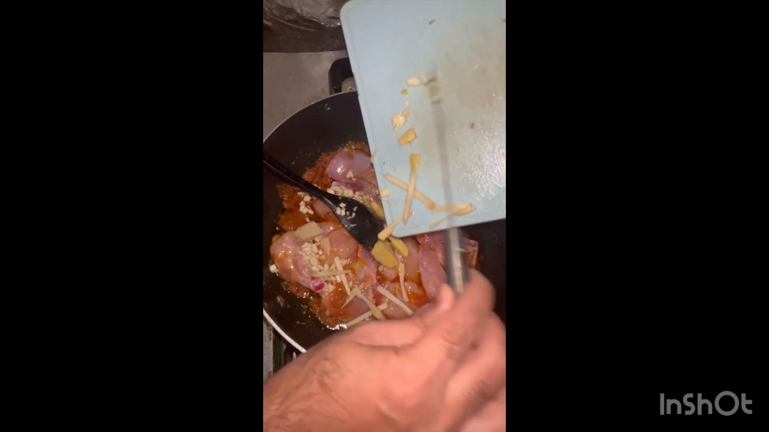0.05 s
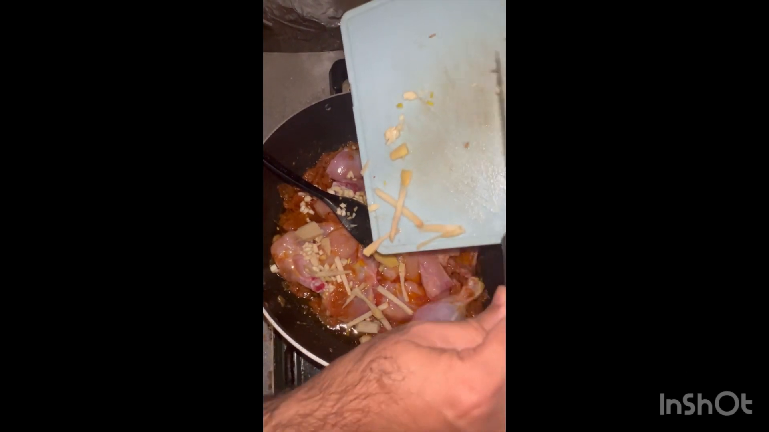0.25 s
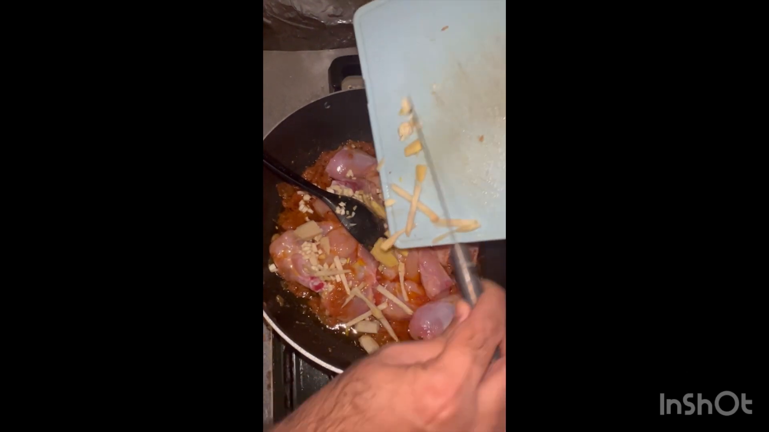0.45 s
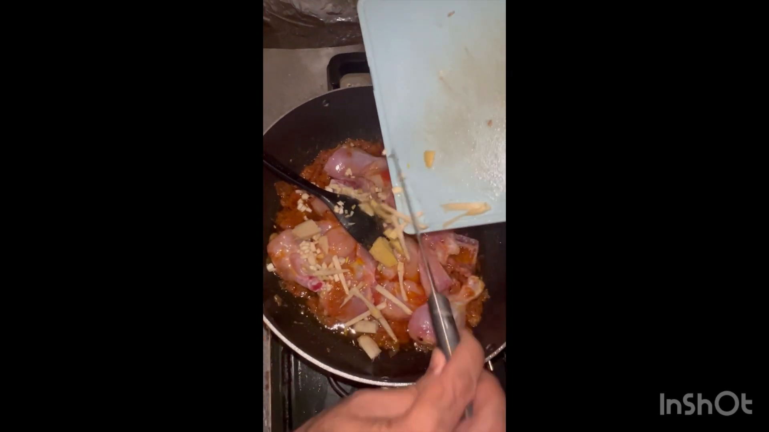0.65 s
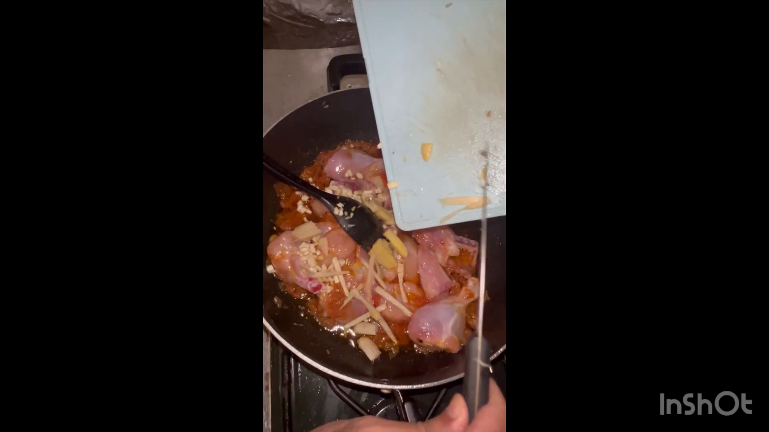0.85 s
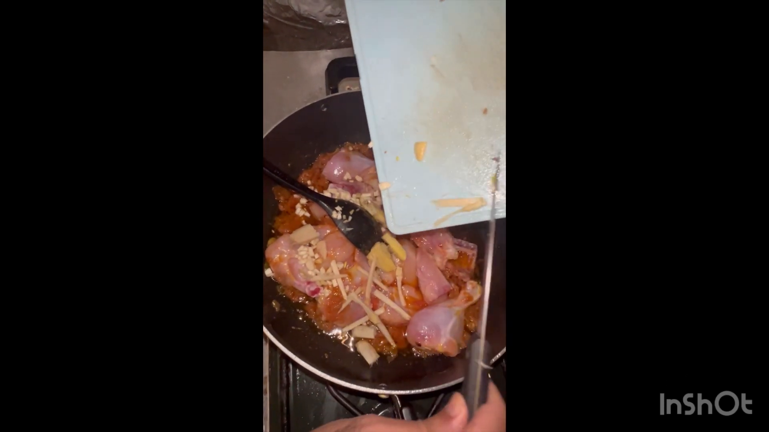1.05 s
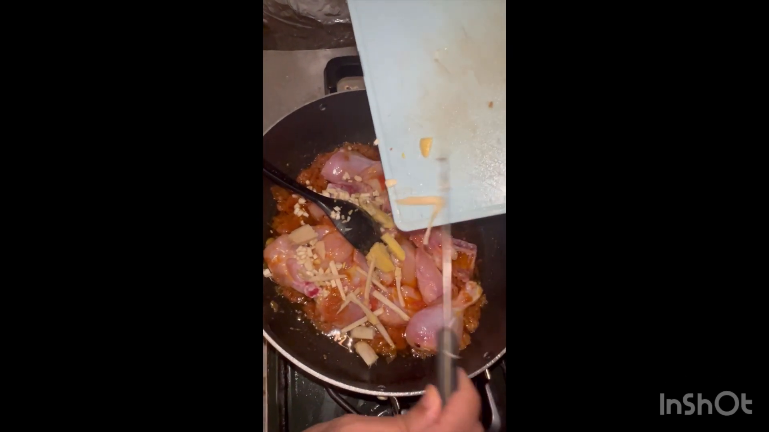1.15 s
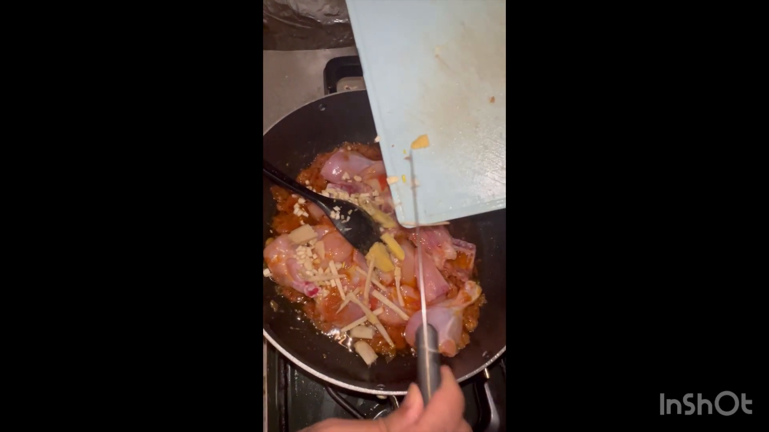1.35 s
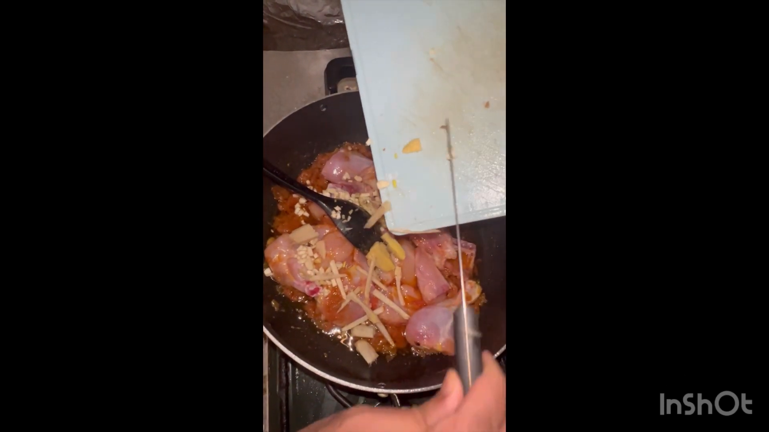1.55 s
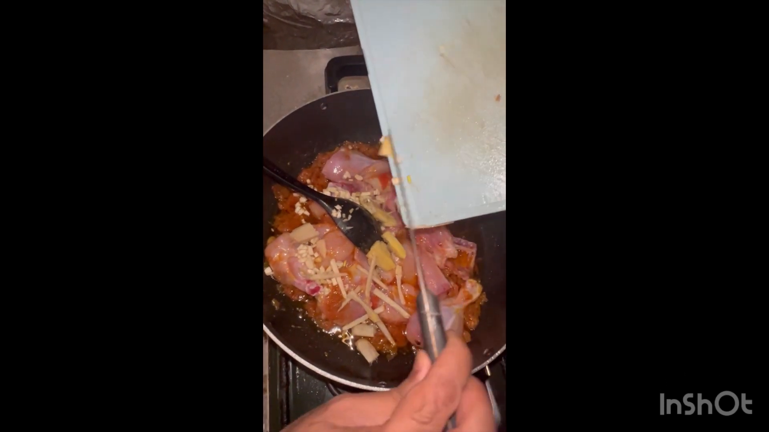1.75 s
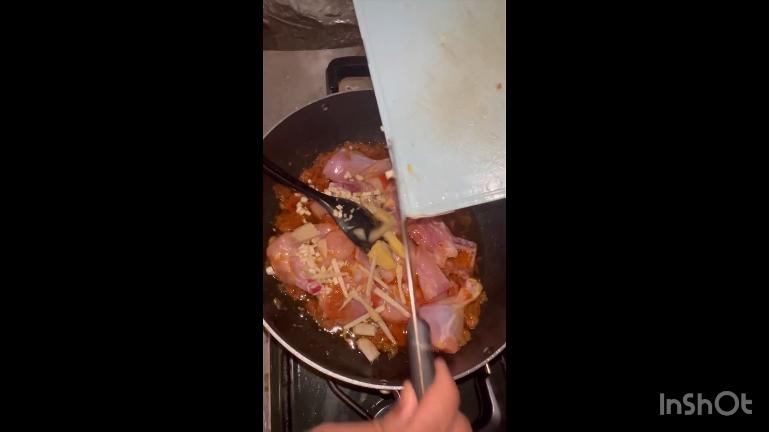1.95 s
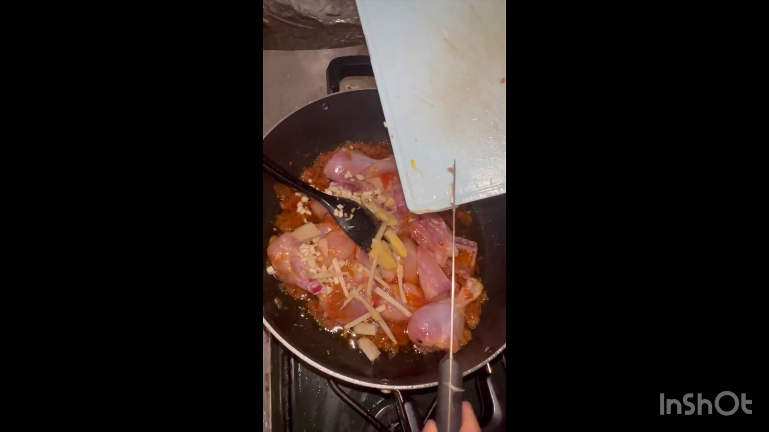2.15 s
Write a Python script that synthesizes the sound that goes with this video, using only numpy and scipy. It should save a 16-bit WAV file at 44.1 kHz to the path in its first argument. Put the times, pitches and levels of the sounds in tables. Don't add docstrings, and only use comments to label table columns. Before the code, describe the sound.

A knife scrapes a plastic cutting board close up: three hard knocks, each followed by a short gritty rasp, the first loudest. Scraps patter lightly into a pan. Small kitchen, low electrical hum, close stereo microphone.

```python
import sys
import numpy as np
from scipy import signal
from scipy.io import wavfile
from scipy.ndimage import uniform_filter1d

SR = 44100
rng = np.random.default_rng(int(sys.argv[2]) if len(sys.argv) > 2 else 0)


def wav_out(sig):
    wavfile.write(sys.argv[1], SR, np.round(np.clip(np.atleast_2d(sig).T, -1, 1) * 32767).astype(np.int16))


def invert_db(level):
    return 10 ** (np.asarray(level, dtype=float) / 20)


N = 97020

MEAN_BRIGHT_DB, DULL_HZ, BRIGHT_HZ = -10, 818, 6300
TILT_CURVE = 0.76
RASP_DB = 0.94

# frequency in Hz, level in dB per Hz.
RASP_SPECTRUM = [(1000, -20), (2300, -26.5), (3000, -18), (6000, -17), (11500, -24), (13000, -40),
                 (15000, -28), (17000, -40)]
# frequency in Hz, left-right likeness (1 = identical).
CONTACT_LIKENESS = [(900, 0.66), (2500, 0.32), (5000, 0.73), (12000, 0.63)]
# start in seconds, peak in dB, sharpness in dB per octave,
# crack level in dB, crack tilt in dB per octave.
BLOWS_1 = [
    (0.2155, -12, 2.5, -2.5, -9),
    (0.2309, -19.5, 2, -25, -11.5),
    (0.239, -19.5, -13, -4.5, -8.5),
    (0.551, -25, -27, -14.5, -0.5),
]
BLOWS_2 = [
    (0.995, -18, 0.5, -4.5, -6.5),
    (1.003, -29.5, 1, -10, -15),
    (1.297, -44, 0, -3.5, -10),
    (1.308, -51.5, 2.5, 8, -9),
]
BLOWS_3 = [
    (1.5494, -12.5, -0.5, -4.5, -10),
    (1.5649, -19, -10, -14, -8.5),
    (1.5728, -26, -4.5, 0, -13.5),
    (1.7497, -27.5, 2, -5, 2),
    (1.82, -44.5, 0.5, 1.8, -1),
    (1.931, -67.5, 6, 8.5, 0.5),
]


def rms_one(x):
    return x / np.sqrt(np.mean(x ** 2) + 1e-20)


def at_hz(points, hz):
    points = np.array(points)
    return np.interp(np.log(hz), np.log(points[:, 0]), points[:, 1])


def high_pass(x, hz, order):
    return signal.sosfilt(signal.butter(order, hz, "high", fs=SR, output="sos"), x)


def band_pass(x, low_hz, high_hz, order):
    return signal.sosfilt(signal.butter(order, [low_hz, high_hz], "band", fs=SR, output="sos"), x)


def drift(rate_hz):
    r = np.exp(-2 * np.pi * rate_hz * 8 / SR)
    slow = signal.lfilter([1], [1, -2 * r, r * r], rng.standard_normal(N // 8 + 4002))
    slow = slow[4000:]
    return np.interp(np.arange(N) / 8, np.arange(len(slow)), rms_one(slow - slow.mean()))


def fade(clicks, t60):
    return signal.lfilter([1], [1, -invert_db(-60 / (t60 * SR))], clicks)


def ring(x, hz, t60):
    r, w = invert_db(-60 / (t60 * SR)), 2 * np.pi * hz / SR
    return signal.lfilter([0, np.sin(w)], [1, -2 * r * np.cos(w), r * r], x + 1e-18)


def placed(x, hz):
    beaming = min(hz / 2500, 1)
    pan_db = 2 * beaming * rng.standard_normal()
    lag = (0.000025 * rng.standard_normal() + 0.000001) * SR
    n = np.arange(N)
    left = invert_db(pan_db / 2) * np.interp(n - lag / 2, n, x)
    right = invert_db(-pan_db / 2) * np.interp(n + lag / 2, n, x)
    return np.array([left, right])


def bands(pairs, spectrum, likeness, gain, lowest_hz):
    out = 0
    edges = lowest_hz * 2 ** np.arange(0, np.log2(20000 / lowest_hz), .5)
    for k, (low, high) in enumerate(zip(edges, edges[1:])):
        mid, side = band_pass(pairs[k % 2], low, high, 2)
        hz = np.sqrt(low * high)
        alike = np.clip(at_hz(likeness, hz), 0, 1)
        stereo = np.sqrt(1 + alike) * mid + np.sqrt(1 - alike) * side * [[1], [-1]]
        out = out + invert_db(at_hz(spectrum, hz)) * gain(hz) * stereo
    return out


def room_noise():
    # frequency in Hz, level in dB per Hz.
    floor = [(36, -19), (60, 8), (160, 2.5), (260, -2.5), (450, -0.5), (2100, -18), (3300, -51),
             (14000, -43)]
    # frequency in Hz, left-right likeness.
    likeness = [(60, 0.98), (240, 0.69), (950, 0.24), (3770, 1), (15000, 0.29)]
    noise = bands(rng.standard_normal((2, 2, N)), floor, likeness, lambda hz: invert_db(drift(10)), 26.5)
    above = high_pass(noise, 150, 4)
    whine_hz, whine_width_hz, whine_db = 5250, 710, -74.5
    whine = rms_one(ring(rng.standard_normal((2, N)), whine_hz, 0.82 / whine_width_hz))
    return invert_db(-60.5) * noise / above.std() + whine * invert_db(whine_db + 2 * drift(21.3))


def hum():
    # time in seconds, hum strength in dB rms.
    swell = [
        (0.0, -47),
        (0.26, -45),
        (0.87, -48),
        (1.08, -46),
        (2.2, -46.5),
    ]
    # frequency in Hz, level in dB rms.
    side_lines = [(49.5, -63), (125, -66.5), (151, -66), (297, -69.5), (425, -66.5)]
    t = np.arange(N) / SR
    s, db = np.transpose(swell)
    out = np.sqrt(2) * invert_db(np.interp(t, s, db)) * np.sin(2 * np.pi * 99.4 * t + 0.14 * drift(5.7))
    for hz, level_db in side_lines:
        line = np.sin(2 * np.pi * hz * t + 0.14 * drift(21))
        out = out + np.sqrt(2) * invert_db(level_db + 0.57 * drift(2.4)) * line
    return out


def kitchen(x):
    t60_s, wall_cut_hz = 0.43, 9900
    out, dull = np.zeros((2, N)), np.exp(-2 * np.pi * wall_cut_hz / SR)
    lags = (rng.uniform(.012, .04, 20) * SR).astype(int)
    for k, lag in enumerate(lags):
        loop, state = x.copy(), [0.]
        gain = invert_db(-60 * lag / SR / t60_s)
        for i in range(lag, N, lag):
            back, state = signal.lfilter([gain * (1 - dull)], [1, -dull], loop[i - lag:i], zi=state)
            loop[i:i + lag] += back[:N - i]
        out[k % 2] += (loop - x) * (-1) ** (k // 2)
    return out


def wet_ticks():
    # start in seconds, peak in dB.
    contacts = [
        (0.7692, -91),
        (0.789, -40),
        (0.8623, -39),
        (1.367, -42),
        (1.94, -45),
        (1.9572, -37),
        (2.189, -40.5),
    ]
    clicks = np.zeros(N)
    for s, db in contacts:
        clicks[int(s * SR)] = invert_db(db - 17)
    shape = fade(clicks + 1e-18, 0.059)
    return band_pass(shape * rng.standard_normal((2, N)), 3405, 8000, 3)


def strike(events, modes, sharp_db):
    bend_lag_cycles, strike_db, spread_db = 0.63, -3.5, 1.5
    out, rows = 0, np.array(events)
    luck = rng.standard_normal((len(rows), len(modes)))
    for k, (hz, level_db, t60) in enumerate(modes):
        clicks = np.zeros(N)
        at = ((rows[:, 0] + bend_lag_cycles / hz) * SR).astype(int)
        tilt_db = sharp_db * max(np.log2(hz / DULL_HZ), 0)
        clicks[at] = invert_db(rows[:, 1] + level_db + strike_db + tilt_db + spread_db * luck[:, k])
        out = out + placed(ring(clicks, hz, t60), hz) * (-1) ** k
    return band_pass(out, 122, 5050, 3)


def scraps_in_pan():
    # start in seconds, peak in dB.
    landings = [
        (.604, -41),
        (.612, -46),
        (.62, -50),
        (.639, -36),
        (.66, -51),
        (1.938, -36.5),
        (1.9587, -44),
        (2.0895, -52),
    ]
    # frequency in Hz, level in dB, t60 in seconds.
    pan_modes = [(925, -4, 0.052), (1140, -8.5, 0.02), (1323, -4.5, 0.04), (1706, 4.5, 0.012),
                 (1890, 0.5, 0.019), (2587, -9.5, 0.008)]
    return strike(landings, pan_modes, 0)


def cracks():
    # frequency in Hz, level in dB per Hz.
    spectrum = [(1000, -5), (6000, -1.5), (9000, -1.5), (16000, -13)]
    s, db, _, crack_db, tilt_db = np.transpose(BLOWS_1 + BLOWS_2 + BLOWS_3)
    rise = 0.0006 * SR

    def burst(hz):
        clicks = np.full(N, 1e-18)
        clicks[(s * SR).astype(int)] = invert_db(db + crack_db + tilt_db * np.log2(hz / 1000))
        clicks = uniform_filter1d(clicks, size=int(rise), origin=int(rise / 2) - 1)
        return fade(clicks, 0.005) + invert_db(-10) * fade(clicks, 0.075)

    return 3 * bands(rng.standard_normal((2, 2, N)), spectrum, CONTACT_LIKENESS, burst, 850)


def knife_blows():
    # frequency in Hz, level in dB, t60 in seconds.
    spot_1 = [(127, -12.5, 0.025), (262, -8, 0.035), (359, -11.5, 0.053), (608, 0.5, 0.033),
              (708, 1.5, 0.014), (960, -5.5, 0.025), (1205, -12.5, 0.054), (1560, -15, 0.0073),
              (1820, -13, 0.021), (2170, -6.5, 0.0087), (2520, -38, 0.017), (3214, -16, 0.015),
              (3830, -15, 0.0069)]
    spot_2 = [(139, -12.5, 0.048), (246, -10.5, 0.059), (399.2, -16, 0.11), (688.6, 2.5, 0.015),
              (853.4, -7.5, 0.028), (1200, -12.5, 0.016), (1620, -2, .01), (2120, -2, 0.019),
              (2430, -1.5, 0.015), (2690, -12.5, 0.03), (3260, -11, 0.021), (3580, -13, 0.032)]
    spot_3 = [(249, -16.5, 0.032), (380, -12.5, 0.09), (574.7, -3, 0.029), (650, 2.5, 0.025),
              (789.5, -4, 0.019), (936, -7.5, 0.031), (1168, -10, 0.0055), (1480, -11.5, .007),
              (1793, -2, 0.032), (2074, -3.5, 0.021), (2340, -5, 0.036), (2710, -12.5, 0.024),
              (3313, -16, 0.012), (3500, -16, 0.027)]
    out = 0
    for blows, modes in ((BLOWS_1, spot_1), (BLOWS_2, spot_2), (BLOWS_3, spot_3)):
        out = out + strike(blows, modes, np.array(blows)[:, 2])
    return out


def blade(drive, tilt_db):
    count, width_hz = 28, 80
    out, t60 = 0, 2.2 / width_hz
    pitches = np.geomspace(1100, 6500, count) * invert_db(0.324 * rng.standard_normal(count))
    for k, hz in enumerate(pitches):
        gain = invert_db(at_hz(RASP_SPECTRUM, hz) + RASP_DB - 14 + tilt_db(hz) + 3.5 * drift(16.4))
        out = out + placed(ring(drive[k % 4] * gain, hz, t60), hz) * 300 / (t60 * SR)
    return out


def chatter(level_db, bright_db, favoured_hz):
    phase = 2 * np.pi * np.cumsum(favoured_hz * (1 + .035 * drift(48.3))) / SR
    gain_db = level_db - 2.5 + 0.29 * (MEAN_BRIGHT_DB - bright_db) + 0.5 * drift(35)
    return placed(invert_db(gain_db) * np.sin(phase), DULL_HZ)


def board_under_edge(slips, level_db, surge_db, tilt_db, favoured_hz, flex_db):
    # frequency in Hz, width in Hz, level in dB.
    modes = [(279.3, 64, -11.5), (346.3, 81.2, -7), (580, 42, -6), (639.2, 92.3, -3.5), (708, 95, -5),
             (895, 77, 1), (1289, 26, -15), (1498, 155, -18), (1795, 80, -12), (2238, 210, -18),
             (2448, 59, -10.5), (3303, 232, -17.5), (4400, 200, -25.5)]
    favour_db_per_octave, catch_high_share = 29.5, 0.12
    out = 0
    for k, (hz, width_hz, db) in enumerate(modes):
        low_mode = k < 6
        if k < 2:
            where_db = flex_db
        else:
            where_db = -favour_db_per_octave * np.abs(np.log2(hz / favoured_hz)) * low_mode
        caught_db = surge_db * (1 if low_mode else catch_high_share)
        wander_db = (1 if low_mode else 2) * drift(12.4)
        gain_db = level_db + caught_db + tilt_db(hz) + where_db + wander_db
        drive = slips[max(k - 5, 0) % 4] * invert_db(gain_db)
        if low_mode:
            drive = band_pass(drive, hz - width_hz, hz + width_hz, 2)
        t60 = 2.2 / width_hz
        out = out + placed(ring(drive, hz, t60), hz) * invert_db(db) * 300 / (t60 * SR)
    return out


def stroke_controls():
    # time in seconds, pressure as level in dB, edge brightness in dB,
    # pitch the contact point favours in Hz, board flex in dB.
    tail = [
        (0.0, -52, -16, 650, -3.5),
        (0.098, -76, -16, 650, -5),
        (0.12, -75, -9, 650, 16),
    ]
    stroke_1 = [
        (0.244, -34, -46, 655, -1),
        (0.252, -34.5, -19.5, 614.9, 0),
        (0.307, -25, -24, 626.8, -13),
        (0.362, -25, -20.5, 687, -14),
        (0.392, -29, -12, 619.4, -11.5),
        (0.45, -29.5, -15, 738.6, -7),
        (0.541, -42.5, 3, 795, 7.5),
        (0.553, -35, -29.5, 706, -5),
        (0.587, -72, 7, 705, 11),
    ]
    stroke_2 = [
        (1.005, -40.5, -26, 662.3, -7),
        (1.047, -50, -16, 683, 3),
        (1.055, -36.5, -19, 719, 4.5),
        (1.091, -32.5, -13.5, 697.5, -22),
        (1.122, -37, -3, 688, -38),
        (1.179, -36.5, -12.5, 623.7, -14.5),
        (1.238, -38, -17, 580, -4.5),
        (1.25, -41.5, -22.5, 623, -8),
        (1.29, -69, -38, 625, 3),
    ]
    stroke_3 = [
        (1.58, -39, -27.5, 623.5, -1.5),
        (1.633, -37, -16.5, 682.4, 2.5),
        (1.665, -37.5, -18, 650, -10),
        (1.7, -38.5, -13, 718.7, 7.5),
        (1.735, -46.5, -0.5, 715, -1),
        (1.747, -37, -22.5, 725, 20.5),
    ]
    slide_off = [
        (1.765, -49, -36, 650, 3),
        (1.798, -65.5, -15, 650, 11.5),
        (1.816, -50, -3.5, 730, 12.5),
        (1.87, -101, -15, 650, -10),
    ]
    t, mean_flex_db = np.arange(N) / SR, -3.5
    controls = np.tile([[-150.], [MEAN_BRIGHT_DB], [650], [mean_flex_db]], N)
    for stroke in (tail, stroke_1, stroke_2, stroke_3, slide_off):
        s, *columns = np.transpose(stroke)
        on = (t >= s[0]) & (t < s[-1])
        controls[:, on] = [np.interp(t[on], s, c) for c in columns]
    level_db, bright_db, favoured_hz, flex_db = controls
    judder_db = -1 * drift(45)
    return uniform_filter1d(level_db, size=200) + judder_db, bright_db, favoured_hz, flex_db - mean_flex_db


def scrape():
    # time in seconds, surge in dB (negative: a dip).
    catches = [(.265, 2.5), (0.294, 1), (0.316, 0), (.33, -0.5), (0.354, 6.5), (0.369, 4), (.375, 2),
               (0.392, -0.5), (0.404, 5), (.437, -6.5), (.453, 0), (0.468, 0), (1.064, -3.5), (1.096, 2.5),
               (1.21, 1.5), (1.238, 5), (1.655, 6), (1.7, 4.5)]
    level_db, bright_db, favoured_hz, flex_db = stroke_controls()
    t, catch_s = np.arange(N) / SR, 0.0022
    surge_db = sum(db * np.exp(-.5 * ((t - s) / catch_s) ** 2) for s, db in catches)

    def tilt_db(hz):
        height = np.log(hz / DULL_HZ) / np.log(BRIGHT_HZ / DULL_HZ)
        return np.clip(height, 0, 1.05) ** TILT_CURVE * (bright_db - MEAN_BRIGHT_DB)

    slips_per_s, spread_db = 4000, 2.8
    sizes = invert_db(spread_db * np.minimum(rng.exponential(1, (4, N)), 5)) * rng.choice([-1, 1], (4, N))
    slips = rms_one(sizes * (rng.random((4, N)) < slips_per_s / SR))
    body = chatter(level_db + surge_db, bright_db, favoured_hz)
    body = body + board_under_edge(slips, level_db, surge_db, tilt_db, favoured_hz, flex_db)
    grit = ((slips + rng.standard_normal((4, N))) * invert_db(level_db)).reshape(2, 2, N)
    rasp = bands(grit, RASP_SPECTRUM, CONTACT_LIKENESS, lambda hz: invert_db(tilt_db(hz) + 1.5 * drift(30)), 850)
    steel = blade(slips * invert_db(level_db), tilt_db)
    return high_pass(body + invert_db(RASP_DB) * rasp * 3 + steel, 263, 4)


def scene():
    near = scrape() + knife_blows() + cracks() + scraps_in_pan() + wet_ticks()
    send = high_pass(near.mean(axis=0), 990, 1)
    near[0] = np.roll(near[0], 1) * invert_db(-.3)
    return near + invert_db(-19.5) * kitchen(send) + hum() + room_noise()


def top_cut(x):
    return signal.sosfilt(signal.butter(12, 16330, fs=SR, output="sos"), x)


def record(dry):
    soft = signal.sosfilt(signal.butter(1, 13100, fs=SR, output="sos"), dry)
    soft = signal.sosfilt(signal.cheby2(10, 50, 16300, fs=SR, output="sos"), soft)
    dip_hz, dip_width_hz, dip_share = 13400, 2200, .7
    dip = band_pass(soft, dip_hz - dip_width_hz / 2, dip_hz + dip_width_hz / 2, 1)
    return top_cut(soft - dip_share * dip)


dry = scene()
out = record(dry)
wav_out(out)
```